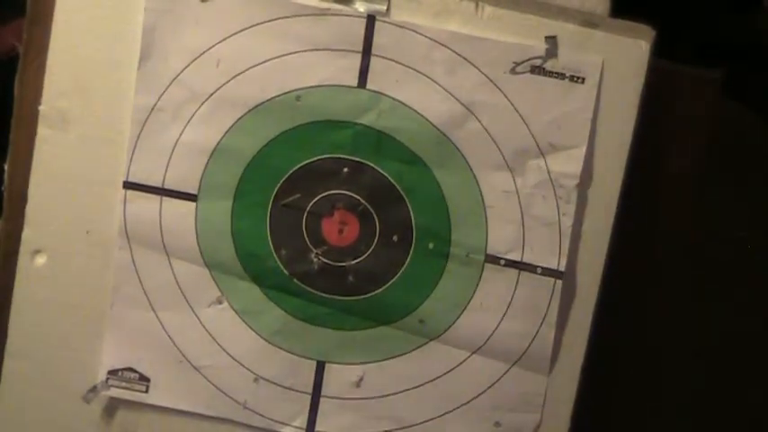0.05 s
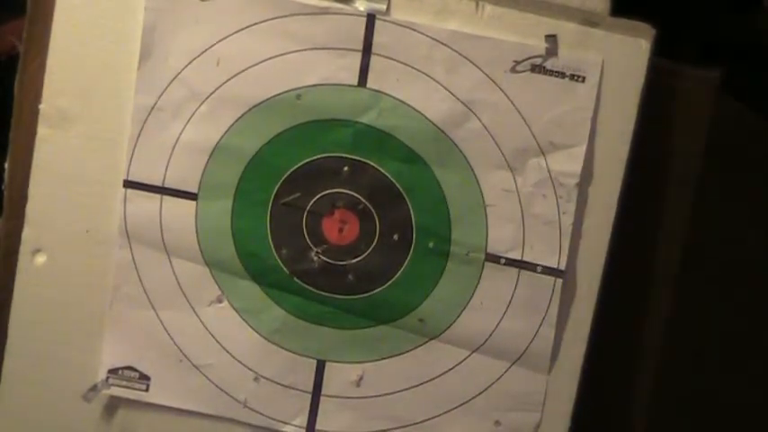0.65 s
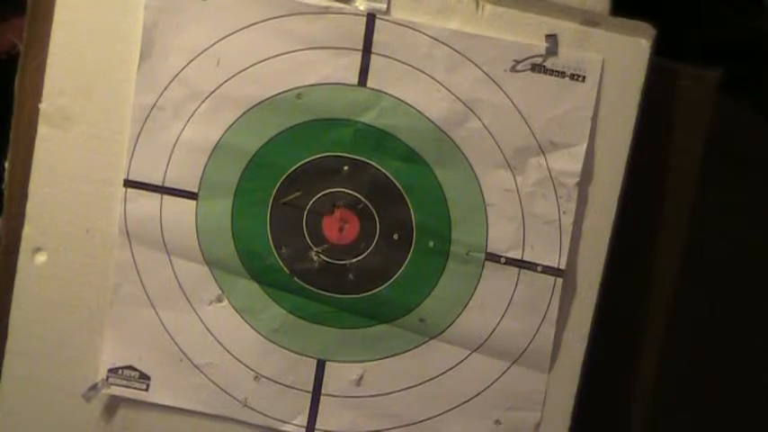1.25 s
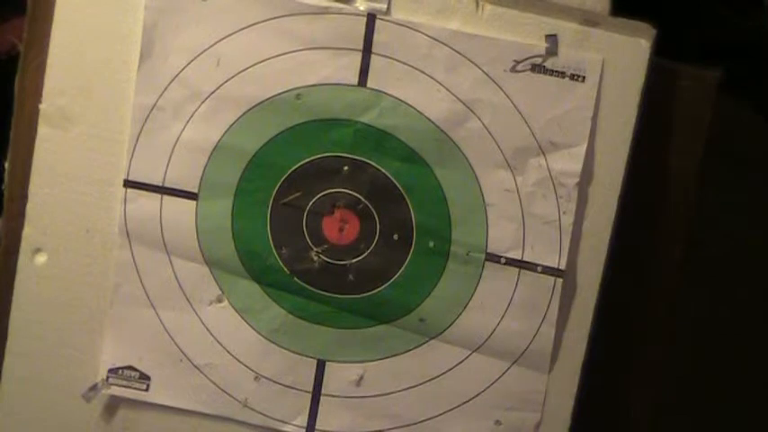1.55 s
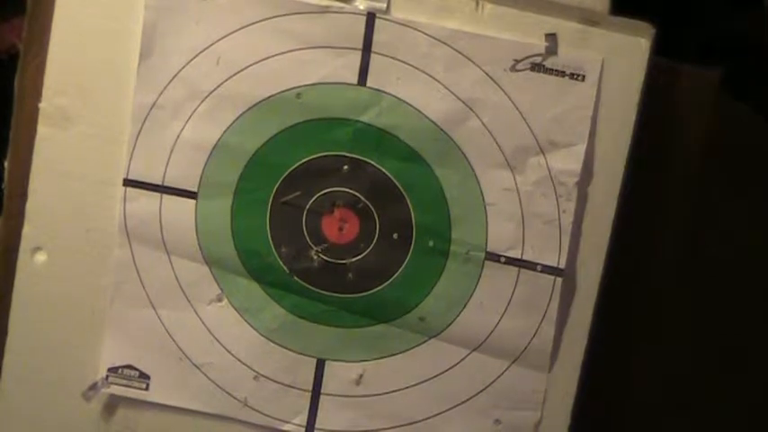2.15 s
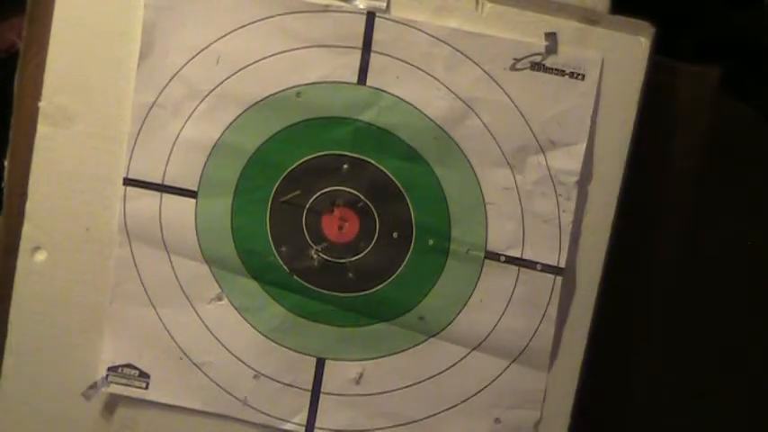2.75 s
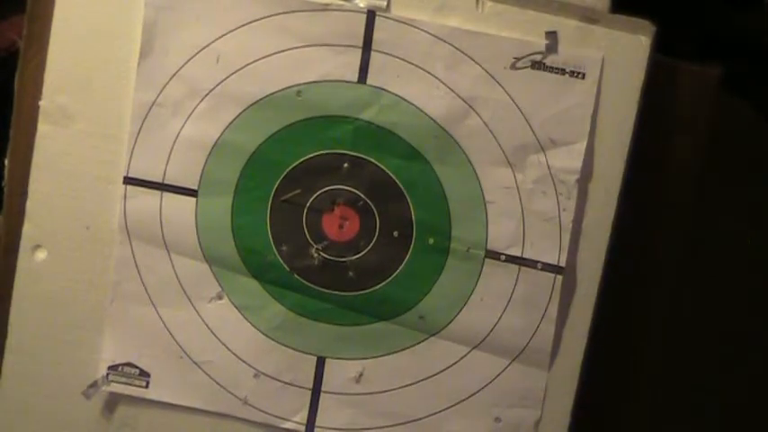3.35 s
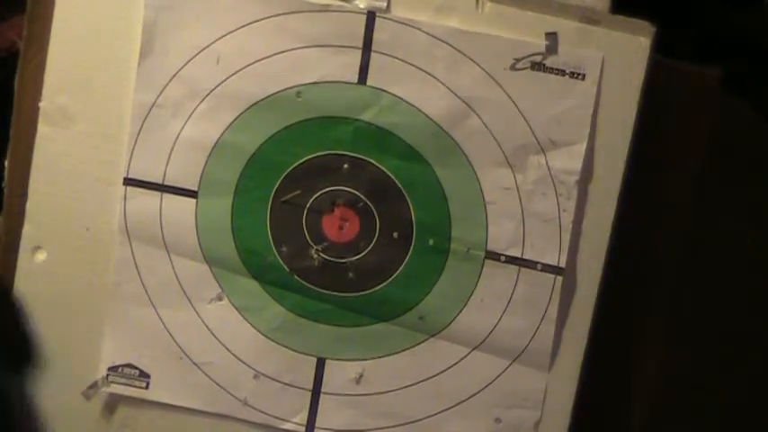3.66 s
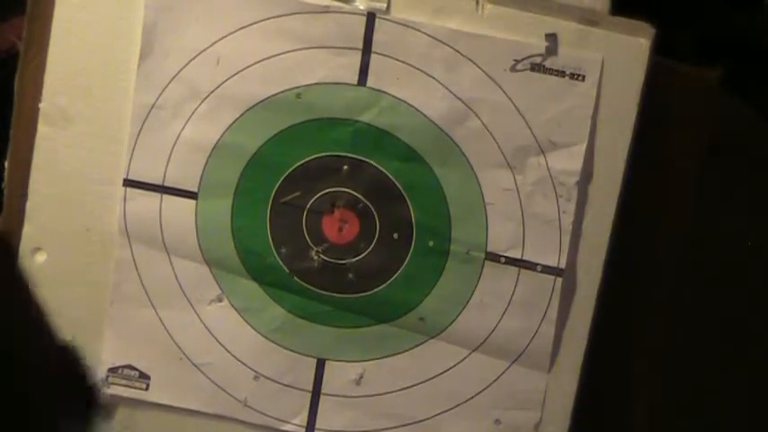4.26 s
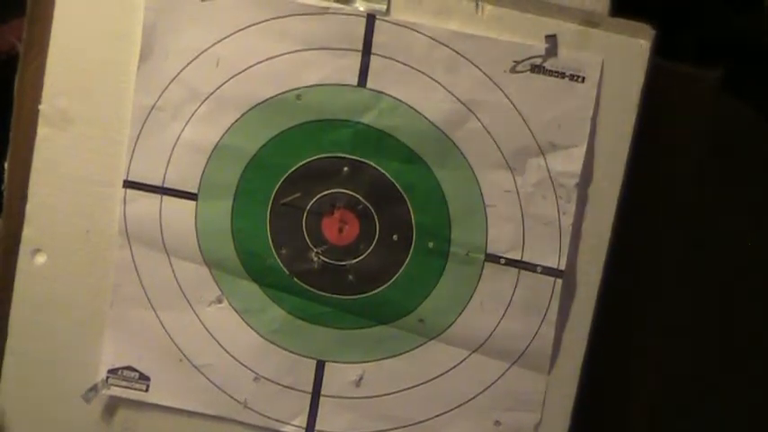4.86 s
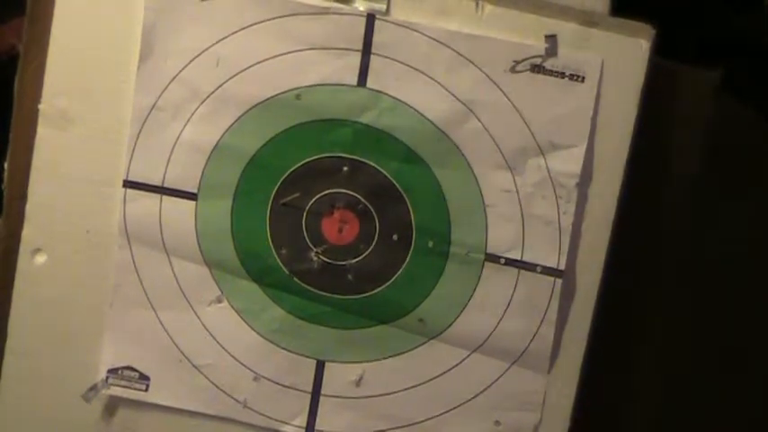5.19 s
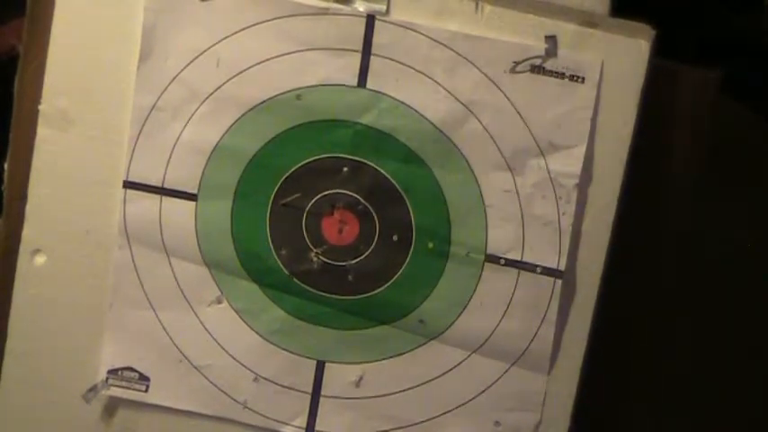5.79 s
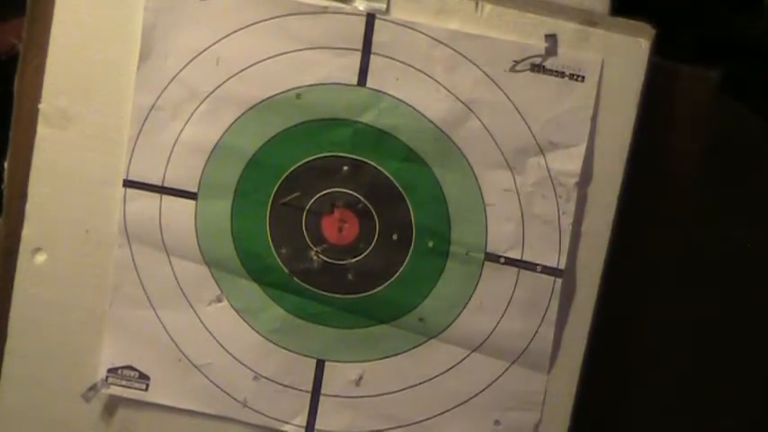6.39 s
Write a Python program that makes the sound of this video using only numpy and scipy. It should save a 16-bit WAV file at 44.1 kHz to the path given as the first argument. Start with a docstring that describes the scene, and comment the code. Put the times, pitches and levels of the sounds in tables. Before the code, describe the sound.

In a small hard-walled workshop, a metal bolt knocks and slides quietly as an air pistol is loaded. Then come six even pumping strokes, each a click as the steel lever frees, a clack as it opens and a loud slam as it shuts. The slams slightly overload the close microphone, and the lever opens once more at the end. A faint room hum lies underneath.

```python
"""Pumping an air pistol

A pump air pistol is loaded and pumped six times in a small workshop. The bolt knocks and slides; then
the lever clicks free, swings open against its stop and slams shut. Each impact excites the modes of
the steel, and sliding friction adds hiss and scrapes. The slams overload the close microphone's input,
and the hard walls answer with a short bright tail over a low rush and a faint hum."""
import sys
import numpy as np
from scipy import signal
from scipy.fft import rfft, irfft, next_fast_len
from scipy.io import wavfile
from scipy.ndimage import uniform_filter1d

SR = 44100
rng = np.random.default_rng(int(sys.argv[2]) if len(sys.argv) > 2 else 0)


def persist_wave(psi):
    """Save psi, clipped to +-1, as 16-bit WAV."""
    counts = np.round(np.clip(psi, -1, 1) * 32767).astype(np.int16)
    wavfile.write(sys.argv[1], SR, np.atleast_2d(counts).T)


N = 283563
WAYS = 6  # rows of a source: direct mid, direct side, and four directions out into the room

# lever slamming shut: (time [s], level [dB], body boost [dB], treble boost [dB], pitch [ratio],
# thump level [dB], lead of the latch tick [s])
SLAMS = [(2.6918,12.5,0,0.5,1.11,-17,0.00666), (3.2963,11.5,1.5,6,0.93,-31,0.02347),
         (3.918,11.5,1.5,3.5,1.08,-32.5,.0248), (4.59,10.5,4,5.5,0.99,-17.5,0.0067),
         (5.2323,11,0,5.5,1.13,-35,.0087), (5.8584,10.5,4,8,1.06,-34.5,.0239)]
# spectrum of a slam: (frequency [Hz], level [dB])
SLAM_COLOUR = [(60, -49.5), (230, -14), (380, -16), (500, -5), (620, -3.5), (850, -0.5), (1200, 7),
               (1700, 14.5), (2700, 13), (3150, 9.5), (3850, 16), (4500, 9), (7000, 1.5), (10000, -1.5),
               (15500, -16)]
def slams(seat_s=.0021, seat_db=2, graze_s=0.0072, graze_db=-33, wet_db=-1):
    """Successive impacts: the lever grazes and meets the tube, then the piston bottoms out."""
    out = np.zeros((WAYS, N))
    for s, db, *tone, pitch, _, _ in SLAMS:
        graze = impact(SLAM_COLOUR, db + graze_db, *tone, chatter_s=0.0089, snap=.2, pitch=pitch)
        add(out, s - graze_s, graze)
        add(out, s, impact(SLAM_COLOUR, db, *tone, chatter_s=0.0018, snap=0.57, pitch=pitch))
        add(out, s + seat_s, impact(SLAM_COLOUR, db + seat_db, *tone, chatter_s=0.0014, snap=0.38))
    out[2:] *= amp(wet_db)
    return out


def thumps(rise_s=0.0006, lag_s=.002):
    """Overload transient: a short low thump as each slam overloads the microphone input."""
    out = np.zeros((2, N))
    age = np.arange(SR // 20) / SR / rise_s
    thump = np.outer([1, 1], age * np.exp(1 - age))
    for s, *_, db, _ in SLAMS:
        add(out, s + lag_s, amp(db) * thump)
    return out


# lever hitting its open stop: (time [s], level [dB], body boost [dB], treble boost [dB])
STOPS = [(2.3547, 5.5, 2.5, 4.5), (3.0132, 7.5, 3.5, 2), (3.6007, 6, 7.5, 5.5), (4.2177, 5.5, 7.5, 3),
         (4.8987, 9, 0, 1.5), (5.5584, 7, 4, 2), (6.1748, 7, 4.5, 3.5)]
# spectrum of that impact: (frequency [Hz], level [dB])
STOP_COLOUR = [(50, -9), (130, -7), (250, 2), (400, -7), (620, 2.5), (1000, -1), (1850, 9.5), (2600, 3.5),
               (3500, 10), (4500, -2.5), (6400, 1.5), (9200, -1.5), (10300, -13.5), (15500, -26)]
# modes of the open lever: (frequency [Hz], decay time T60 [s], level [dB])
CANTILEVER_MODES = [(242, 0.0387, -36.5), (596.4, 0.045, -33.5), (1824, 0.038, -24.5), (3614, .04, -26)]
def stops(graze_s=.0035, graze_db=-10, shudder_s=.016, shudder_db=-12):
    """Cantilever vibration: the slack is taken up, and the lever hits its stop, rings and shudders."""
    out = np.zeros((WAYS, N))
    for s, db, *tone in STOPS:
        add(out, s - graze_s, impact(STOP_COLOUR, db + graze_db, *tone, chatter_s=0.015, snap=0.085))
        add(out, s, impact(STOP_COLOUR, db, *tone, chatter_s=0.00225, snap=0.53))
        add(out, s + shudder_s, impact(CLICK_COLOUR, db + shudder_db, 0, 0, chatter_s=0.02, snap=0))
        for mode in CANTILEVER_MODES:
            add(out, s, ping(*mode))
    return out


# bolt striking the breech: (time [s], level [dB], body boost [dB], treble boost [dB], pitch [ratio])
KNOCKS = [(0.6656,10,-14,7,0.91), (0.671,2.5,-5,-6,0.98), (.7527,-8,-13,-28.5,1.46), (0.834,-16,4,-5,1.153),
          (0.8778,-13.5,2,-17,1.185), (1.2463,-7,0.5,-5.5,1.149), (1.3639,-24,8,10,0.73),
          (1.938,-9,6,1.5,0.923), (1.9577,-16,12.5,-7,0.88)]
# spectrum of a knock: (frequency [Hz], level [dB])
KNOCK_COLOUR = [(80, -30), (400, -12.5), (750, 0), (1050, 18.5), (1800, 4), (3000, 7), (5000, -3),
                (8000, -8), (11000, -18.5), (15500, -33)]
def knocks(wet_db=-2):
    """Acoustic shielding: the hands screen the dull rattling impacts of the bolt from the room."""
    out = np.zeros((WAYS, N))
    for s, db, *tone, pitch in KNOCKS:
        add(out, s, impact(KNOCK_COLOUR, db, *tone, chatter_s=0.0046, snap=0.262, pitch=pitch))
    out[2:] *= amp(wet_db)
    return out


# lever pulled open: (slack time [s], slack level [dB], catch time [s], catch level [dB],
# release time [s], release level [dB], rebound level [dB])
OPENINGS = [(2.8133, -1.5, 2.8488, -4, 2.866, 5, 6), (3.4274, -2, 3.4537, 6, 3.476, 8, 7.5),
            (4.0368, 0, 4.0658, 5, 4.0896, 11, 2.5), (4.715, -4, 4.742, 6, 4.7665, 4, 8),
            (5.3681, -4.5, 5.3983, 8, 5.4216, 2.5, 2), (5.999, -2.5, 6.0294, 9, 6.055, -0.5, 2)]
# two bounces after each stop: (first time [s], first level [dB], second time [s], second level [dB])
RATTLES = [(2.4358, -7, 2.4825, -4), (3.0552, -5, 3.0866, -6), (3.645, -5, 3.6768, -6.5),
           (4.2634, -5, 4.2944, -6.5), (4.9453, -2.5, 4.975, -7), (5.6014, -12, 5.6298, -8),
           (6.2181, 0, 6.2451, -6)]
# ticks after the second bounce: (delay [s], level [dB], body boost [dB], treble boost [dB])
SETTLING = [(.045, -19, -2.5, 5.5), (.085, -15, 7, -11)]
# latch brushing its catch before each slam: (level [dB], body boost [dB], treble boost [dB])
LATCH_TICK = (-6.5, -11.5, 6)
# tone of each contact: (body boost [dB], treble boost [dB])
SLACK_TONE, CATCH_TONE, FREE_TONE, REBOUND_TONE = (3.4, -4), (-1.45, -5.5), (-1, 3.4), (3.7, 8)
FIRST_RATTLE_TONE, SECOND_RATTLE_TONE = (0.88, 2), (10.3, 0.93)
def linkage(rebound_s=0.0066):
    """Backlash: play in the joints makes small contacts on every stroke, listed like HANDLING."""
    rows = [(s - lead_s, *LATCH_TICK) for s, *_, lead_s in SLAMS]
    for slack_s, slack_db, catch_s, catch_db, free_s, free_db, rebound_db in OPENINGS:
        rows += [(slack_s, slack_db, *SLACK_TONE), (catch_s, catch_db, *CATCH_TONE),
                 (free_s, free_db, *FREE_TONE), (free_s + rebound_s, rebound_db, *REBOUND_TONE)]
    for first_s, first_db, second_s, second_db in RATTLES:
        rows += [(first_s, first_db, *FIRST_RATTLE_TONE), (second_s, second_db, *SECOND_RATTLE_TONE)]
        rows += [(second_s + later_s, *tick) for later_s, *tick in SETTLING]
    return rows


# latch and other handling clicks: (time [s], level [dB], body boost [dB], treble boost [dB])
HANDLING = [(0.6496, -13, 7, 4.5), (0.901, -24, 23, 16), (2.102, 0, 0.5, -2.5), (2.142, -9.5, 11, -12),
            (2.1539, -10, 11, 0), (2.1697, 3.5, 10.5, 3), (2.4578, -1.5, -19, 2.5),
            (2.9955, -18.5, -7.5, 14), (3.2844, -11, 0, 6), (4.4219, -21, 0, 9), (4.5639, -16.5, -4.5, -1),
            (4.894, -12, 14, 18), (5.5528, -6.5, 15, 11)]
# spectrum of a click: (frequency [Hz], level [dB])
CLICK_COLOUR = [(80, -24.5), (300, -20.5), (800, -10.5), (1500, 4.5), (2800, 1), (3800, 2), (4700, -4.5),
                (6500, -2.5), (8500, -10), (10500, -17.5), (15500, -26.5)]
def clicks(graze_s=0.0034, graze_db=-17, rattle_s=.0015, rattle_db=-4):
    """Contact bounce: two faces graze, meet with a crisp tick, and the loose joint rattles briefly."""
    out = np.zeros((WAYS, N))
    for s, db, *tone in HANDLING + linkage():
        add(out, s - graze_s, impact(CLICK_COLOUR, db + graze_db, *tone, chatter_s=0.0071, snap=0))
        add(out, s, impact(CLICK_COLOUR, db, *tone, chatter_s=0.001, snap=0.33))
        add(out, s + rattle_s, impact(CLICK_COLOUR, db + rattle_db, *tone, chatter_s=0.0051, snap=0.12))
    return out


def impact(colour, db, body_db, treble_db, chatter_s, snap, pitch=1, body_hz=1200, treble_hz=5000):
    """Source and filter: a broadband contact is coloured by the parts that meet."""
    excitation = contact(chatter_s, snap)
    hz = np.linspace(0, SR / 2, excitation.shape[1])
    body_shelf = 1 / (1 + (hz / body_hz) ** 4)
    treble_shelf = 1 - 1 / (1 + (hz / treble_hz) ** 4)
    levels_db = db + read(colour, hz / pitch) + body_db * body_shelf + treble_db * treble_shelf
    return irfft(excitation * minimum_phase(levels_db))[:, :len(hz)]


def contact(chatter_s, snap, size=2048):
    """Impulsive excitation: the whitened spectrum of a sharp touch and its dying chatter."""
    t = np.arange(size) / SR
    chatter = rng.standard_normal((WAYS, size)) * np.exp(-t / chatter_s)
    chatter /= np.linalg.norm(chatter, axis=1, keepdims=True)
    chatter[0, 0] += snap  # the touch is in the direct mid row only
    spectrum = rfft(chatter)
    return spectrum / np.sqrt(uniform_filter1d(abs(spectrum) ** 2, size=40, axis=1))


# modes of tube and lever: (frequency [Hz], level against the bare contact [dB], decay time T60 [s])
STEEL_MODES = [(602.5, -1.5, 0.17), (836, -4, 0.054), (1113, -6.5, 0.037), (1685, -4, 0.12),
               (2125, -6, 0.055), (2814.5, -8.5, 0.037), (3870, -3.5, 0.024), (5580, -2.5, 0.025),
               (6500, -1, 0.037), (11513, -8, 0.027)]
def ring(x):
    """Modal resonance: the steel rings on after whatever strikes it."""
    t = np.arange(SR // 4) / SR
    response = signal.unit_impulse(len(t))
    for hz, db, t60 in STEEL_MODES:
        decay = np.log(1000) / t60
        response += amp(db) * 2 * decay / SR * np.exp(-decay * t) * np.cos(2 * np.pi * hz * t)
    return signal.oaconvolve(x, response[None], axes=1)[:, :N]


# loose pins and links left ringing, and the piston squeaking at 6750 Hz after two of the stops: (time [s],
# frequency [Hz], decay time T60 [s], level [dB])
PINGS = [(.666,1054,.035,-18.5), (1.9397,2590,0.028,-31.5), (1.958,1200,.025,-27.5), (2.1677,1900,.08,-27),
         (2.169,5582,.06,-31), (2.3545,2280,0.069,-17), (2.694,2004,.1,-13), (3.272,5580,.04,-33.5),
         (3.809,6750,.04,-47), (4.422,6750,.04,-44), (4.7732,8769,.05,-39.5), (5.2235,3450,.03,-26),
         (5.4295,6500,.03,-23.5), (5.8351,3530,.04,-24), (6.061,5582,.025,-16)]
def pistol(impacts_db=-1):
    """Structure-borne sound: all impacts pass through the metal, and loose parts add their own notes."""
    out = amp(impacts_db) * ring(slams() + stops() + knocks() + clicks())
    for s, hz, t60, db in PINGS:
        add(out, s, ping(hz, t60, db))
    return out


def ping(hz, t60, db):
    """Damped free vibration: one mode, with its own phase in each direction."""
    t = np.arange(SR // 4) / SR
    return amp(db - 60 * t / t60) * np.sin(2 * np.pi * (hz * t + rng.random((WAYS, 1))))


# hands and bolt sliding while loading: (centre time [s], duration [s], level [dB])
RUBS = [(0.04, .1, -63), (0.455, 0.28, -68), (0.655, 0.033, -48), (0.87, 0.24, -57.5),
        (1.227, 0.064, -53.5), (1.574, .045, -61), (1.75, 0.072, -59), (1.928, 0.11, -56),
        (2.225, 0.29, -62)]
def sliding(pull_db=-43, piston_db=-57, piston_lag_s=.06, grain_db=2.5, grain_s=0.0052):
    """Sliding friction: a fine hiss swells with each movement and flutters as the surfaces catch."""
    t = np.arange(N) / SR
    level = sum(amp(db) / (1 + (2 * (t - s) / length) ** 4) for s, length, db in RUBS)
    for *_, free_s, _, _ in OPENINGS:  # the linkage rubs harder until the lever breaks free
        level += amp(pull_db) * swell(t - free_s, rise_db_per_s=97.5, fall_db_per_s=223)
    for s, *_ in STOPS:  # the piston rubs after the stop
        level += amp(piston_db) * swell(t - s - piston_lag_s, rise_db_per_s=171.5, fall_db_per_s=44.5)
    hiss = friction_noise()
    grain_times = np.arange(0, N / SR, grain_s)
    flutter = np.interp(t, grain_times, rng.standard_normal(N)[:len(grain_times)])
    return hiss * level * amp(grain_db * flutter)


# spectrum of the sliding hiss: (frequency [Hz], relative level [dB])
SLIDE_COLOUR = [(200, -29), (800, 9), (1300, 17.5), (2200, 17), (4000, 11.5), (6700, 10), (9500, 3),
                (15000, -9.5)]
def friction_noise():
    """Random excitation: rubbing surfaces radiate broadband noise, independent in each direction."""
    return unit(tint(rng.standard_normal((WAYS, N)), SLIDE_COLOUR))


# scrapes of piston and grip: (time [s], duration [s], frequency [Hz], half-width [Hz], level [dB])
SCRAPES = [(.295, 0.032, 1130, 120, -56), (1.549, 0.037, 1050, 250, -54.5), (1.71, 0.087, 4900, 500, -64),
           (1.94, 0.045, 1000, 300, -49), (2.281, 0.091, 990, 350, -54), (2.349, 0.46, 1130, 250, -57),
           (2.363, 0.354, 740, 200, -54), (3.721, 0.25, 900, 600, -59.5), (4.422, 0.085, 850, 410, -57),
           (5.697, 0.098, 610, 129.6, -48), (5.714, .09, 1400, 249, -55)]
def scrapes():
    """Friction-driven resonance: noise in a single band makes each soft hollow scrape."""
    out = np.zeros((WAYS, N))
    for s, length, hz, width_hz, db in SCRAPES:
        size = next_fast_len(round(length * SR))
        resonance = 1 / (1 + ((np.fft.rfftfreq(size, 1 / SR) - hz) / width_hz) ** 2)
        noise = rng.standard_normal((WAYS, SR))[:, :size]
        scrape = irfft(rfft(noise) * resonance, size)
        add(out, s, amp(db) * unit(scrape) * signal.windows.tukey(size, .7))
    return out


# reflections from nearby surfaces: (delay [s], gain [ratio])
ECHOES = [(.0009, -0.081), (.0024, -0.0094), (.0069, 0.051), (.0088, -0.12), (0.0126, .15), (.0235, 0.078)]
# stereo width of the direct sound and of the tail: (frequency [Hz], side against mid [dB])
DIRECT_WIDTH = [(100, -19), (1000, -16.5), (2000, -15.5), (4000, -14), (8000, -8), (12000, 1.5)]
ROOM_WIDTH = [(100, 2), (600, -13.5), (1200, -11), (2000, -8), (4000, -5), (8000, -3), (12000, 4.5)]
def workshop(x):
    """Direct and diffuse fields: a narrow sound with early reflections, inside a wider tail."""
    near = x[:2].copy()
    for delay, gain in ECHOES:
        add(near, delay, gain * x[:2])
    far = np.array([room_tail(x[2:]), room_tail(x[2:])])
    return stereo(near, DIRECT_WIDTH) + stereo(far, ROOM_WIDTH)


# reverberation time of the workshop: (frequency [Hz], decay time T60 [s])
ROOM_T60 = [(150, 0.1), (600, 0.27), (1800, 0.27), (4000, 0.3643), (8000, 0.31), (15000, 0.39)]
# spectrum of the tail: (frequency [Hz], level [dB])
ROOM_COLOUR = [(80, -12.5), (250, -8.5), (600, -6), (1000, -8.5), (1600, -6), (4000, -9.5), (8000, -10.5),
               (15000, -17.5)]
def room_tail(x, build_s=0.0025):
    """Reverberation: each direction meets other walls and gets its own tail, shortest in the bass."""
    t = np.arange(SR * 3 // 4) / SR
    hz, frame_s, noise = signal.stft(rng.standard_normal((len(x), len(t))), SR, nperseg=256)
    t60 = read(ROOM_T60, hz)[:, None]
    decaying = noise * amp(-60 * frame_s / t60) / np.sqrt(t60)
    tail = signal.istft(decaying, SR, nperseg=256)[1][:, :len(t)]
    tail *= 1 - np.exp(-(t / build_s) ** 2)
    tail = tint(tail / np.linalg.norm(tail), ROOM_COLOUR)
    return signal.oaconvolve(x, tail, axes=1).sum(0)[:N]


# spectrum of the still room: (frequency [Hz], relative level [dB])
AIR_COLOUR = [(15, -39), (25, -3.5), (74, 0), (130, 0.5), (170, -6.5), (249, 0.5), (677, -6.5), (818, -5.5),
              (911, -9), (1070, -6.5), (1520, -13), (1940, -12.5), (8140, -25.5), (14800, -35.5),
              (16000, -50.5)]
# its stereo width: (frequency [Hz], side against mid [dB])
AIR_WIDTH = [(40, -13), (120, -10), (250, -6), (1000, -4), (10000, -1)]
def still_air(rush_db=-57, hum_hz=121, hum_db=-72.5):
    """Ambient noise: the low steady rush of the room, with a faint mains hum."""
    hum = amp(hum_db) * np.sin(2 * np.pi * hum_hz * np.arange(N) / SR)
    rush = unit(tint(rng.standard_normal((2, N)), AIR_COLOUR))
    return amp(rush_db) * stereo(rush, AIR_WIDTH) + hum


def amp(db):
    """Decibel scale: level to amplitude ratio."""
    return 10 ** (np.asarray(db) / 20)


def unit(x):
    """Normalisation to an rms of one."""
    return x / np.sqrt(np.mean(x ** 2) + 1e-20)


def read(points, hz):
    """Interpolation of a table on a logarithmic frequency axis."""
    f, value = np.transpose(points)
    return np.interp(np.log(hz + 1), np.log(f + 1), value)


def add(mix, s, sound):
    """Superposition: a sound of several rows joins the mix at time s."""
    part = mix[:, max(round(s * SR), 0):][:, :sound.shape[1]]
    part += sound[:, :part.shape[1]]


def tint(x, points):
    """Zero-phase filtering by a table of (frequency [Hz], level [dB])."""
    size = next_fast_len(x.shape[-1] + 2048)
    gain = amp(read(points, np.fft.rfftfreq(size, 1 / SR)))
    return irfft(rfft(x, size) * gain, size)[..., :x.shape[-1]]


def minimum_phase(db):
    """Minimum phase: the spectrum of the most compact causal pulse with these levels."""
    log_gain = np.log(amp(np.r_[db, db[-2:0:-1]]))
    return np.exp(np.conj(signal.hilbert(log_gain)))[:len(db)]


def stereo(x, width):
    """Sum and difference: mid and side rows become left and right."""
    side = tint(x[1], width)
    return np.array([x[0] + side, x[0] - side])


def swell(t, rise_db_per_s, fall_db_per_s):
    """Exponential growth and decay: a gain that peaks at one when t = 0."""
    return amp(np.minimum(rise_db_per_s * t, -fall_db_per_s * t))


def scene():
    """Superposition: the pistol in its room, the overload thumps and the ambient noise."""
    return workshop(pistol() + sliding() + scrapes()) + thumps() + still_air()


def record(dry, ceiling=1.0, knee=5, low_cut_hz=32, high_cut_hz=15950):
    """Saturation and band limiting: the input flattens the loudest peaks, then filters trim the band."""
    saturated = dry / (1 + abs(dry / ceiling) ** knee) ** (1 / knee)
    high_passed = signal.lfilter(*signal.butter(1, low_cut_hz, "high", fs=SR), saturated)
    low_pass = signal.firwin(301, high_cut_hz, window=("kaiser", 7), fs=SR)
    return signal.oaconvolve(high_passed, low_pass[None], "same")


dry = scene()
out = record(dry)
persist_wave(out)
```